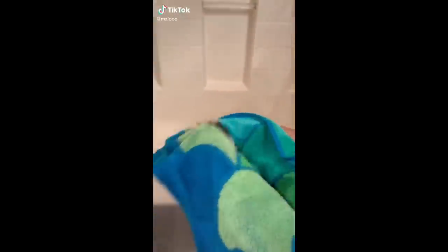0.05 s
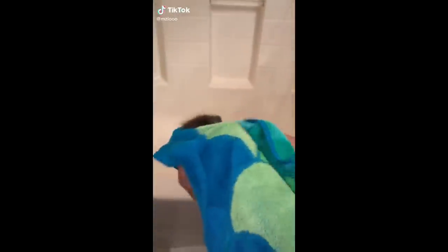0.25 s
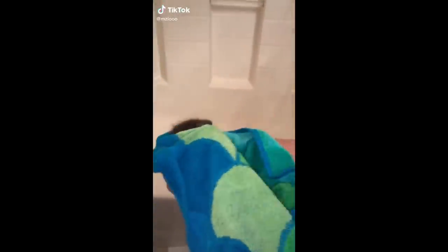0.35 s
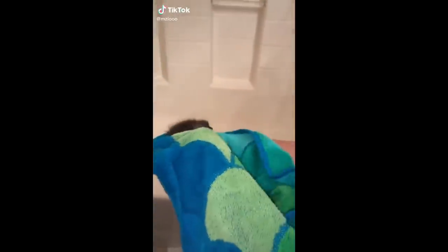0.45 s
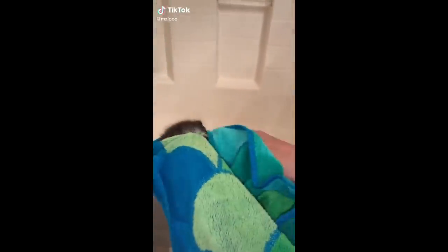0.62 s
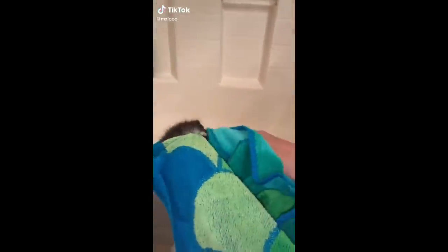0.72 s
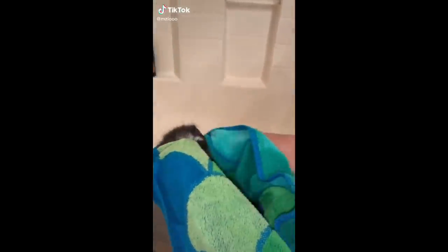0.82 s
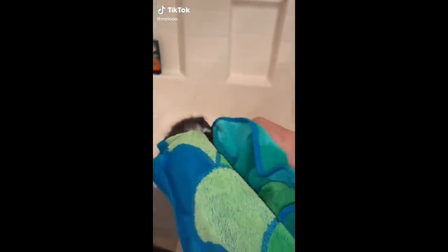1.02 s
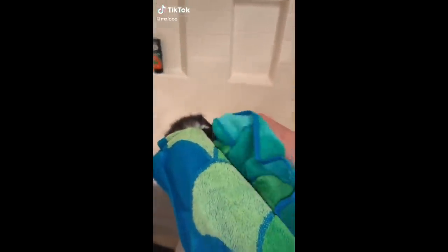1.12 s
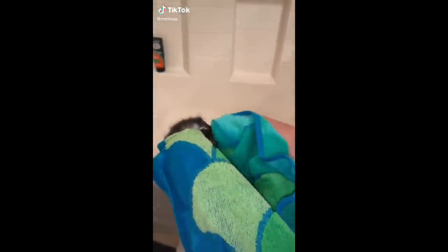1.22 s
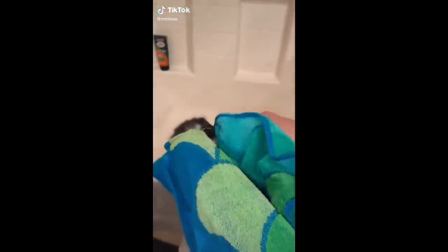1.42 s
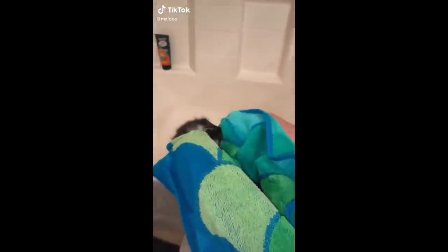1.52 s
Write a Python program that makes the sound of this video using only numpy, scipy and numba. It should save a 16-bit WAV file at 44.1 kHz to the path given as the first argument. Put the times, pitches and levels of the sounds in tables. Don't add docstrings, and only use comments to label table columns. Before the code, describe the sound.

A young raccoon cries close to a phone microphone in a small tiled bathroom: a faint grunt, a raspy cry pinching into a squeal, then a longer harsh cry that breaks into a fast rattle.

```python
import sys
import numpy as np
from scipy import signal
from scipy.fft import rfft, irfft, next_fast_len
from scipy.io import wavfile
from scipy.ndimage import uniform_filter1d
from numba import njit

SR = 44100
rng = np.random.default_rng(int(sys.argv[2]) if len(sys.argv) > 2 else 0)


def to_wav(sig):
    pcm = np.clip(np.atleast_2d(sig), -1, 1) * 32767
    pcm = np.round(pcm).astype(np.int16)
    wavfile.write(sys.argv[1], SR, pcm.T)


def elevation(decibels):
    levels = np.asarray(decibels, float)
    return 10 ** (levels / 20)


N = 68355


def line(rows, column, outside=None):
    rows = np.array(rows, float)
    return np.interp(np.arange(N) / SR, rows[:, 0], rows[:, column], outside, outside)


def rms_one(x):
    return x / np.sqrt(np.mean(x ** 2) + 1e-20)


def drift(rate_hz):
    r = np.exp(-2 * np.pi * rate_hz / SR)
    return rms_one(signal.lfilter([1], [1, -2 * r, r * r], rng.standard_normal(N + 4000))[4000:])


@njit
def moving(x, cosine, r):
    y = np.zeros(len(x))
    for i in range(2, len(x)):
        y[i] = x[i] - x[i - 2] + 2 * r[i] * cosine[i] * y[i - 1] - r[i] * r[i] * y[i - 2]
    return y


def resonance(x, hz, width_hz):
    cosine = np.cos(2 * np.pi * hz / SR) * np.ones(N)
    r = np.exp(-np.pi * width_hz / SR) * np.ones(N)
    evened_for_width = x * (1 - r) ** 1.5
    return rms_one(moving(moving(evened_for_width, cosine, r), cosine, r))


def evened(x):
    fast = uniform_filter1d(x ** 2, int(.008 * SR))
    slow = uniform_filter1d(x ** 2, SR // 8)
    power = fast / (slow + 1e-12)
    return rms_one(x / (power + 0.017) ** (.7 / 2))


# pitch_hz, level_db (per Hz)
ROOM_AIR = [(25, -18.5), (60, -11.5), (130, -19.5), (280, -9), (500, -16.5), (1000, -21.5), (4000, -57),
            (12000, -49)]


def room_air():
    hz = np.fft.rfftfreq(N, 1 / SR) + 1
    air_hz, air_db = np.transpose(ROOM_AIR)
    colour = elevation(np.interp(np.log(hz), np.log(air_hz), air_db))
    mid, side = irfft(rfft(rng.standard_normal((2, N))) * colour, N)
    return elevation(-58) * rms_one(mid + .22 * side * np.array([[1], [-1]]))


def larynx():
    pulse_hz, jitter, spread_db, breath_share = 232.97, .3, 2.5, .6
    cycle = np.cumsum(pulse_hz * np.exp(jitter * drift(120))) / SR
    opens = np.diff(np.floor(cycle), prepend=0) > 0
    pulses = rms_one(opens * elevation(spread_db * rng.standard_normal(N)))
    breath = rms_one(rng.standard_normal(N) * (1.9 + np.exp(-2.5 * (cycle % 1))))
    return np.sqrt(1 - breath_share) * pulses + np.sqrt(breath_share) * breath, breath


def partial(rows, wobble, flutter_db, octave_db):
    turn = 2 * np.pi * np.cumsum(line(rows, 1) * (1 + wobble * drift(63.0))) / SR
    loudness = elevation(line(rows, 2, -120) + flutter_db * drift(50))
    soft_edged = uniform_filter1d(loudness, int(.004 * SR))
    return np.sqrt(2) * soft_edged * (np.sin(turn) + elevation(octave_db) * np.sin(2 * turn))


# time_s, pitch_hz, level_db
HUM_TONE = [
    (0.04, 353, -52),
    (0.076, 342.4, -35.5),
    (0.14, 328, -62.5),
]
# time_s, pitch_hz, level_db
CHEST_TONE = [
    (0.19, 262, -44.5),
    (.3, 258.1, -42.5),
    (0.39, 249, -43.5),
    (.45, 243.5, -43.5),
    (0.478, 230, -61.5),
]


def chest_rasp(source):
    chest = elevation(line(CHEST_TONE, 2, -120)) + .5 * elevation(line(HUM_TONE, 2, -120))
    return elevation(1) * chest * resonance(source, 399, 440)


def chest_tones():
    return partial(CHEST_TONE, 0.032, 5.5, -14.0) + partial(HUM_TONE, 0.033, 0.43, -39.0)


# time_s, level_db, throat_hz, mouth_hz, mouth_opening_db
FAINT_GRUNT = [
    (0, -44.5, 1469, 1780, 0),
    (.03, -49, 1350, 1700, -1),
    (.09, -42.5, 1200, 1940, -3),
    (.175, -77.5, 1240, 1900, 10.5),
]
RASPY_CRY = [(.19, -54.5, 1250, 2230, 3), (0.214, -32.5, 1204, 2390, -2), (0.244, -21.5, 1395, 2250, -0.5),
             (.28, -18.5, 1500, 2100, -1.7), (0.308, -16.5, 1580, 1960, -1.3),
             (0.345, -23.5, 1520, 1800, -2.5), (0.369, -24, 1223, 1810, -7.5),
             (0.401, -24, 1379, 2080, -14.5), (0.417, -34.5, 1256, 2060, -9),
             (0.461, -26.5, 1250, 2180, -13.5)]
MOUTH_CLOSING = [
    (0.501, -26, 1310, 2535, -26),
    (0.558, -27, 1240, 2110, -22),
    (0.599, -18.5, 1330, 1860, -14),
    (0.636, -19.5, 1380, 1680, -1.5),
    (0.674, -43, 1420, 1920, -0.5),
]
SECOND_CRY_BURSTS = [(0.685, -26, 1383, 1970, -0.74), (0.694, -20, 1348, 2250, -0.87),
                     (0.704, -13.5, 1396, 2000, -1.4), (0.722, -21.5, 1400, 2225, -1),
                     (0.732, -35.5, 1390, 2490, 0.02), (.738, -19, 1292, 2400, -0.91),
                     (.752, -39.5, 1417, 2016, -0.38),
                     (0.762, -18.5, 1431, 2250, -0.57), (.771, -23, 1459, 2250, -1.2),
                    (0.779, -16, 1411, 2300, -1.5), (0.788, -22.5, 1421, 2200, -1.2),
                    (.8, -18.5, 1428, 2140, -0.99), (0.821, -22, 1446, 2120, -0.27),
                    (0.845, -20, 1436, 2060, -1.2), (0.854, -26.5, 1387, 2240, -0.68)]
SECOND_CRY_RATTLE = [(.86, -25, 1374, 2170, -0.99), (0.951, -22.5, 1422, 2098, -1.3),
                     (1.02, -26, 1324, 2079, -0.64), (1.053, -30.5, 1336, 2067, -1.5),
                     (1.109, -23.5, 1333, 2094, -0.79), (1.151, -26, 1306, 2090, -1.2),
                     (1.176, -25.5, 1324, 2290, -0.58), (1.284, -27.5, 1210, 2240, -0.31),
                     (1.311, -74.5, 1250, 2250, -0.91)]
# time_s, throat_strength_db, whistle_strength_db
FLAP_THROBS = [(.845, -11, 1.5), (.866, 0.5, 2), (.887, 3.5, 2), (.909, -3, 2.5), (.929, 0, 3.5),
               (.95, -5, -3), (.972, 0, 1.5), (.995, -12, 0.5), (1.02, 0, 2.5), (1.04, -12, -1.5),
               (1.065, 2.5, 5.5), (1.081, -5, 2.5), (1.102, -6.5, 6.5), (1.124, 0.5, 4),
               (1.145, -10.5, -11), (1.167, 1.5, 4), (1.188, 0, 5), (1.211, -9.5, -13), (1.234, -3, -8),
               (1.249, 1.5, -3), (1.275, 1, -6), (1.297, -13, -8)]
# time_s, level_db
RASP_CLEARING = [(.47, 0), (.488, -10), (.55, -10), (.565, -5), (.578, -10), (.608, -10), (.63, 0),
                 (.85, 0), (.87, -4)]
# time_s, width_hz
MOUTH_WIDTHS = [(.2, 660), (.3, 514), (.34, 605), (.45, 450), (.66, 485), (.7, 670), (.76, 510), (.92, 503),
                (.98, 301), (1.06, 265), (1.1, 520), (1.2, 584), (1.3, 425)]
# time_s, pitch_hz
NOSE_PITCH = [(.22, 6750), (.3, 6300), (.64, 6320), (.73, 7170), (.95, 6680), (1.19, 7530), (1.25, 8270)]
# time_s, level_db
HIGHS_LEVEL = [(.1, -8.5), (.19, -3.5), (.235, -9), (.28, -2.8), (.55, 6.7), (.58, 0), (.66, 1), (.7, -0.5),
               (.8, 2.23)]
# pitch_hz, width_hz, level_db, share_of_mouth_opening_followed
UPPER_RESONANCES = [(672.5, 122, -28.5, -0.14), (811, 237, -23, -0.5), (965, 83, -30, 0.9),
                    (2570, 1600, -7.5, 5.5), (3420, 580, -28.5, 10), (5040, 930, -17, 0.34),
                    (8940, 1080, -7.5, 8), (10060, 180, -24.5, 26), (12500, 3400, -26.5, 1)]


def cry():
    rows = FAINT_GRUNT + RASPY_CRY + MOUTH_CLOSING + SECOND_CRY_BURSTS + SECOND_CRY_RATTLE
    t = np.arange(N) / SR
    level, throat_hz, mouth_hz, opening = (line(rows, c) for c in range(1, 5))
    opening = np.minimum(opening, 0)
    source, breath = larynx()

    throb_sweep_hz, flicker_db = 189, 1.5
    on = np.clip((t - .866) / 0.022 + 1, 0, 1)
    turn = 2 * np.pi * np.interp(t, np.array(FLAP_THROBS)[:, 0], np.arange(len(FLAP_THROBS)))
    strength = line(FLAP_THROBS, 1)

    throat_share = np.sqrt(np.clip(1 - elevation(2 * opening), .1, 1))
    throb = elevation(on * (3.5 * np.cos(turn) + strength) + line(RASP_CLEARING, 1))
    throat_width = 310 * np.exp(0.008 * opening)
    throat = resonance(source, throat_hz + on * throb_sweep_hz * np.sin(turn), throat_width)
    out = throat_share * throb * evened(throat)

    mouth = resonance(source, mouth_hz + on * 89.3 * np.sin(turn), line(MOUTH_WIDTHS, 1))
    out += elevation(0.5 + opening + on * 4.4 * np.cos(turn - .5)) * evened(mouth)

    chirp_hz = throat_hz + throb_sweep_hz * np.sin(turn) + 60 * drift(146.5)
    chirp = np.sin(2 * np.pi * np.cumsum(chirp_hz) / SR)
    out += on * elevation(-3.5 + strength) * 2 * np.exp(1.4 * (np.cos(turn) - 1)) * chirp
    out += elevation(-26.5) * resonance(source, 313, 397)

    bright = 0.09 * (level + 24) + on * 3.2 * np.cos(turn) + line(HIGHS_LEVEL, 1)
    nose = (line(NOSE_PITCH, 1), 1160, -12.5, 0.39)
    whistle = (4083, 770, -10 + line(FLAP_THROBS, 2), 1.13)
    for hz, width_hz, db, follows in UPPER_RESONANCES + [nose, whistle]:
        loudness = elevation(db + follows * opening + bright + flicker_db * drift(25))
        out += loudness * resonance(0.13 * source + breath, hz, width_hz)
    return elevation(level + .5 * flicker_db * drift(18)) * out + chest_rasp(source)


# start_s, level_db
FOLD_SLIPS = [(0.19, -46.5), (.197, -39), (0.206, -31), (0.2166, -23), (0.679, -39.5), (.705, -20),
              (.846, -22.5), (.867, -27), (.95, -23.5)]


def slips():
    s, db = np.transpose(FOLD_SLIPS)
    clicks = np.full(N, 1e-18)
    clicks[(s * SR).astype(int)] = elevation(db)
    hollows = [(410, 380, -8.5), (1250, 920, 3.0), (2290, 570, 4.5), (4260, 2700, -43.5)]  # Hz, width Hz, dB
    pop = sum(elevation(level_db) * resonance(clicks, hz, width_hz) for hz, width_hz, level_db in hollows)
    return pop / np.max(np.abs(pop)) * clicks.max() * 3


# time_s, pitch_hz, level_db
SQUEAL_TONE = [(.46, 1274, -35), (.48, 1191, -30.5), (.491, 1330, -25.5), (.512, 1298, -29),
               (.524, 1325, -35), (.532, 1262, -22), (.546, 1202, -33.5), (.556, 1083, -24)]
YELP_TONE = [(.572, 1290, -47), (.579, 1274, -15), (.584, 1359, -40.5), (.588, 1274, -15.5),
             (.594, 1324, -28.5), (.599, 1348, -15), (.612, 1441, -22), (.624, 1456, -28),
             (.64, 1378, -31.5), (.655, 1420, -45)]


def squeal():
    return partial(SQUEAL_TONE, 0.014, 0.59, -13) + partial(YELP_TONE, 0.018, 0.79, -21)


# peak_s, peak_db
CHEST_KNOCKS = [(0.523, -39.5), (0.56, -35), (0.587, -38.5), (0.64, -38.5), (0.72, -29.5), (0.823, -57),
                (0.851, -44), (0.874, -47), (.975, -41), (1.026, -41), (1.478, -57)]


def knocks():
    s, db = np.transpose(CHEST_KNOCKS)[:, :, None]
    t = np.arange(N) / SR - s
    pitch = 352.5 * rng.uniform(.96, 1.04, s.shape)
    swell = elevation(db) * np.exp(-.5 * (t / 0.0041) ** 2)
    return np.sum(swell * np.sin(2 * np.pi * pitch * t), axis=0)


# pitch_hz, left_lead_radians
PORT_LEAD = [(0, 0), (550, -.5), (1500, -.25), (1950, .85), (3400, 1.3), (4850, 3.14), (9000, 9.42),
             (22050, 29.3)]


def ports(x):
    size = next_fast_len(N + 4096)
    lead = np.interp(np.fft.rfftfreq(size, 1 / SR), *np.transpose(PORT_LEAD))
    return irfft(rfft(x, size) * np.exp(.5j * lead * np.array([[1], [-1]])), size)[:, :N]


def bathroom(x):
    t60_s, shared = 0.3, 0.82
    t = np.arange(SR // 2) / SR
    noise = rng.standard_normal((3, len(t)))
    dull = signal.sosfilt(signal.butter(1, 2300, fs=SR, output="sos"), noise)
    tile_ring = signal.butter(1, [1150, 3350], "band", fs=SR, output="sos")
    dull = dull + signal.sosfilt(tile_ring, noise)
    tails = dull + (noise - dull) * elevation(-15 * t / t60_s)
    tails = tails * elevation(-60 * t / t60_s) * (t > .004)
    tails = tails / np.sqrt(np.sum(tails ** 2, axis=1, keepdims=True))
    wet = signal.fftconvolve(x[None], tails, axes=1)[:, :N]
    return np.sqrt(shared) * ports(wet[2]) + np.sqrt(1 - shared) * wet[:2]


def scene():
    tones = squeal() + chest_tones()
    low_cut = signal.butter(4, 215, "high", fs=SR, output="sos")
    voice = signal.sosfilt(low_cut, cry() + tones + knocks() + slips())
    heard = ports(voice) + elevation(-6.5) * bathroom(voice - .6 * tones)
    return heard * elevation(-0.13 * np.array([[1], [-1]])) + room_air()


# low_hz, high_hz
SUM_GAPS = [
    (4650, 5050),
    (12450, 13750),
    (15500, 22050),
]
# low_hz, high_hz
DIFFERENCE_GAPS = [
    (6500, 7350),
    (10450, 11900),
    (14500, 22050),
]


def sum_and_difference(x):
    hz = np.fft.rfftfreq(N, 1 / SR)

    def without(part, gaps):
        kept = [np.clip(np.maximum(a - hz, hz - b) / 90 + .5, 0, 1) for a, b in gaps]
        return irfft(rfft(part) * np.prod(kept, axis=0), N)

    return np.array([without((x[0] + x[1]) / 2, SUM_GAPS), without((x[0] - x[1]) / 2, DIFFERENCE_GAPS)])


# low_hz, high_hz, threshold_db
FAINT_BANDS = [(4300, 4650, -4), (8550, 8950, -2), (8950, 9300, 0), (9300, 9700, -4), (9700, 10300, -13),
               (10300, 10900, -9), (10900, 11400, -2), (11400, 11800, 0), (11800, 12150, -3),
               (12150, 12500, 0), (12500, 13750, -8), (13750, 14500, -7), (14500, 15000, -4),
               (15000, 15500, -2)]


def starve(x):
    hz, _, z = signal.stft(x, SR, "cosine", nperseg=2048)
    whole = np.sum(np.abs(z) ** 2, axis=(0, 1))
    for low, high, db in FAINT_BANDS:
        band = (hz > low) & (hz <= high)
        power = np.sum(np.abs(z[:, band]) ** 2, axis=1)
        usual = power.sum(axis=1, keepdims=True) / whole.sum()
        chance_db = 7 * uniform_filter1d(rng.standard_normal(power.shape), size=4)
        keep = np.minimum(power / whole, usual) > usual * elevation(2 * (db + chance_db))
        z[:, band] *= keep[:, None]
    return signal.istft(z, SR, "cosine", nperseg=2048)[1][:, :N]


def low_pass(x):
    return signal.sosfilt(signal.butter(12, 15450, fs=SR, output="sos"), x)


def record(dry):
    mid, side = starve(sum_and_difference(dry))
    return low_pass(np.array([mid + side, mid - side]))


dry = scene()
out = record(dry)
to_wav(out)
```